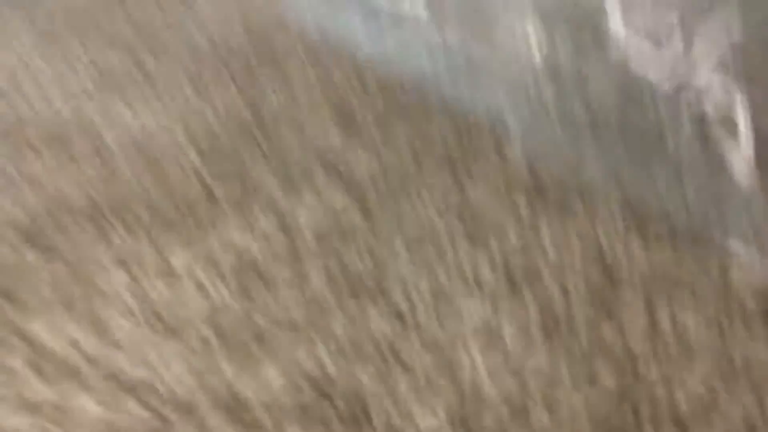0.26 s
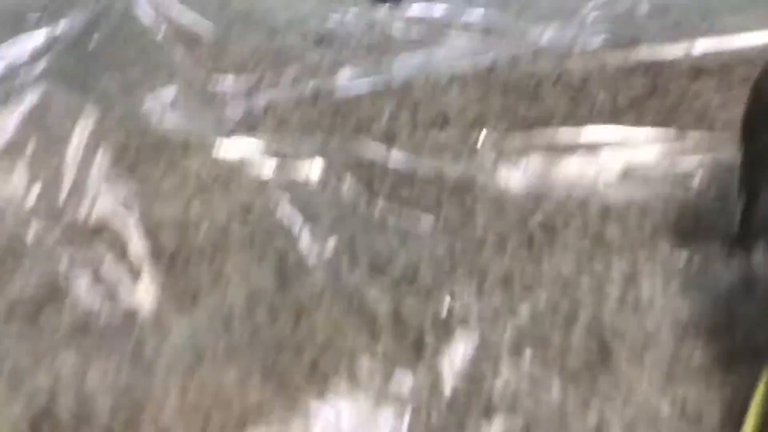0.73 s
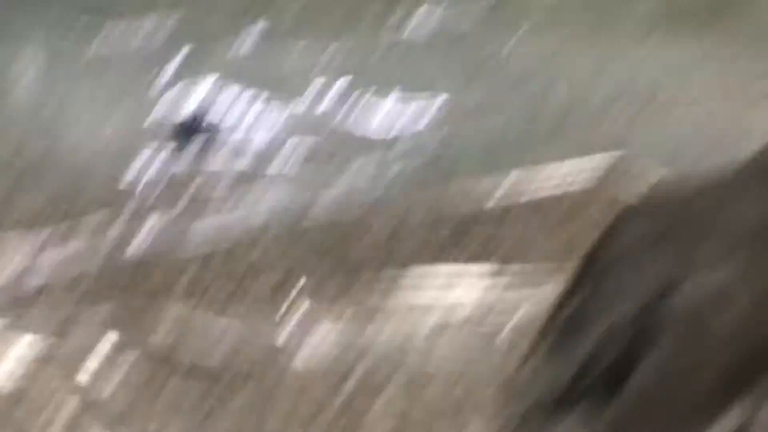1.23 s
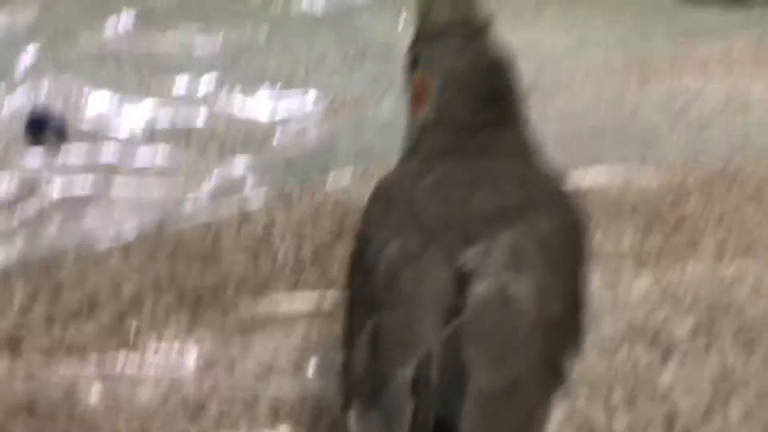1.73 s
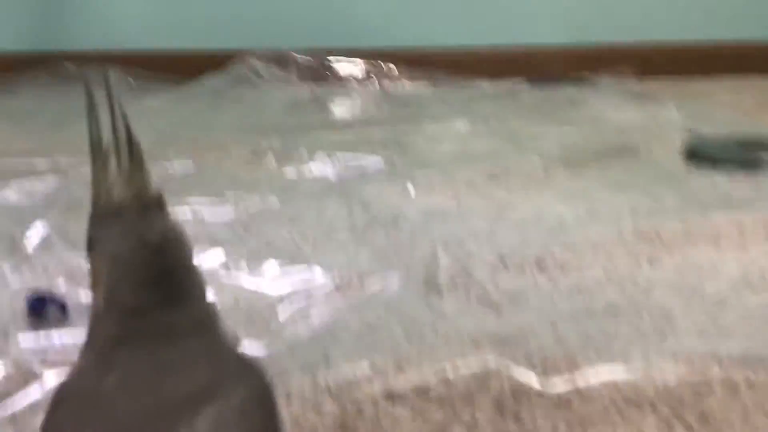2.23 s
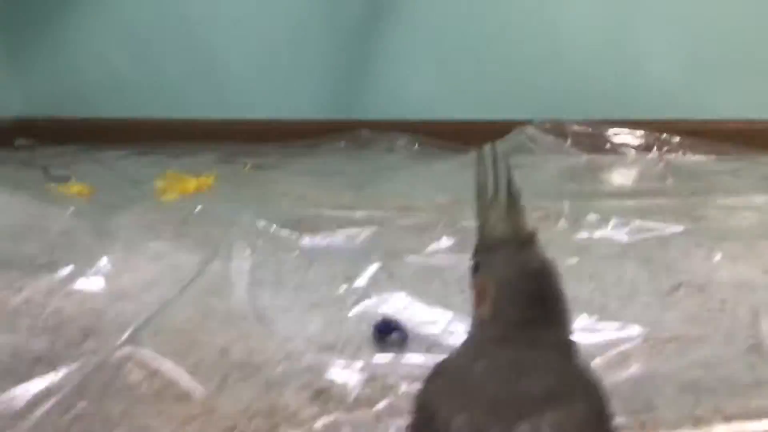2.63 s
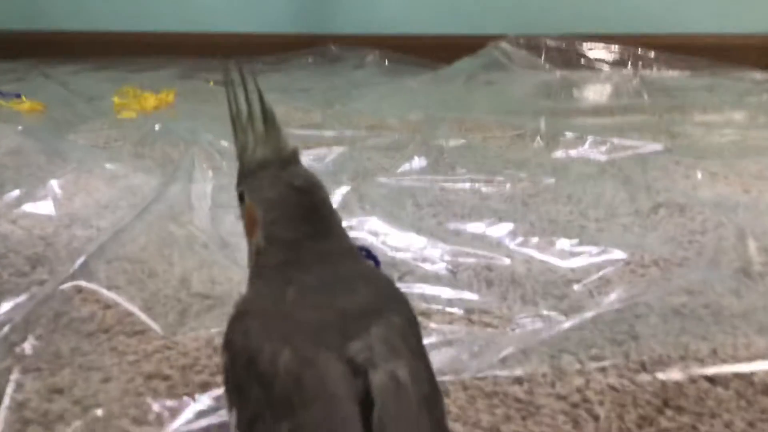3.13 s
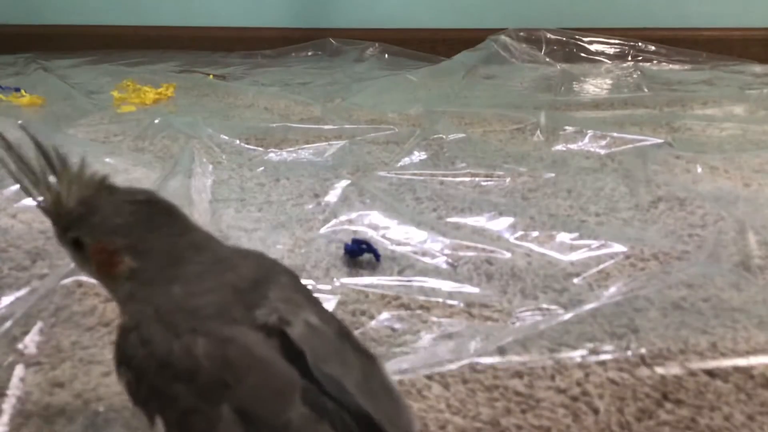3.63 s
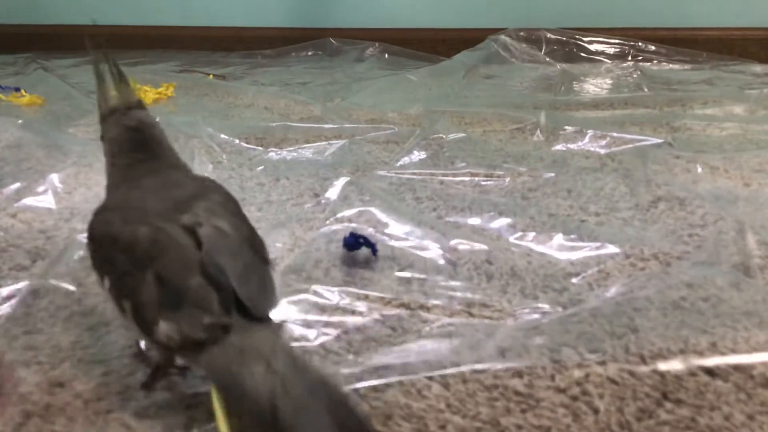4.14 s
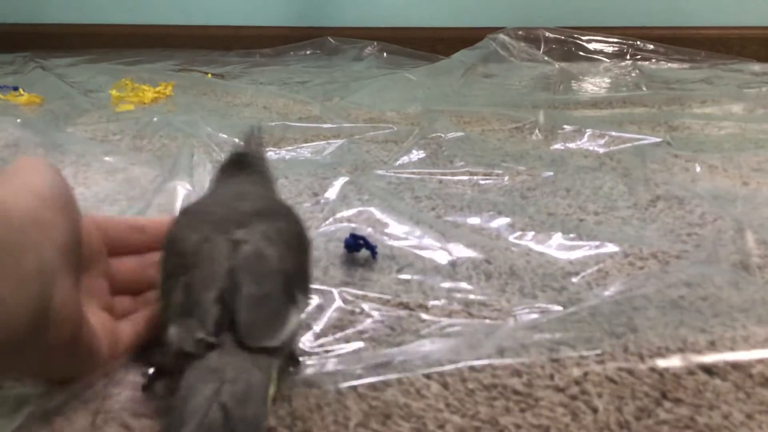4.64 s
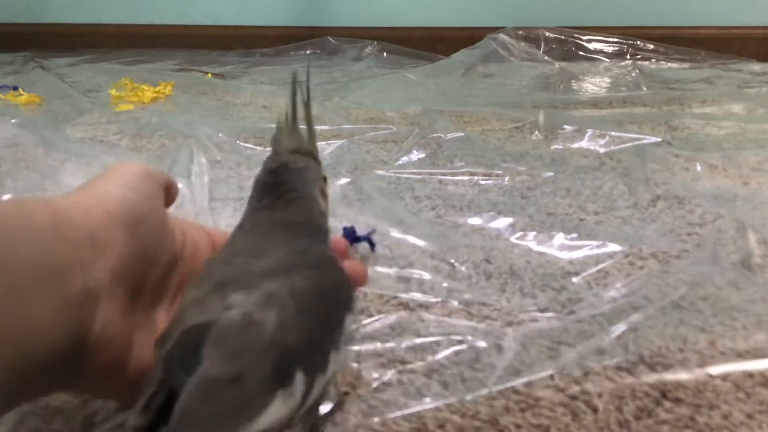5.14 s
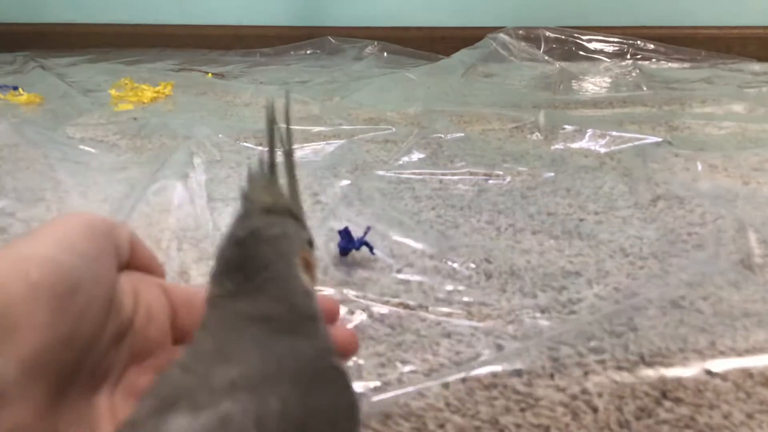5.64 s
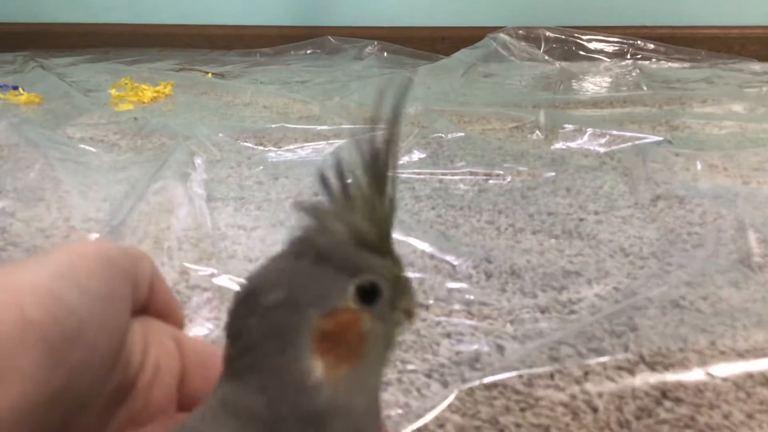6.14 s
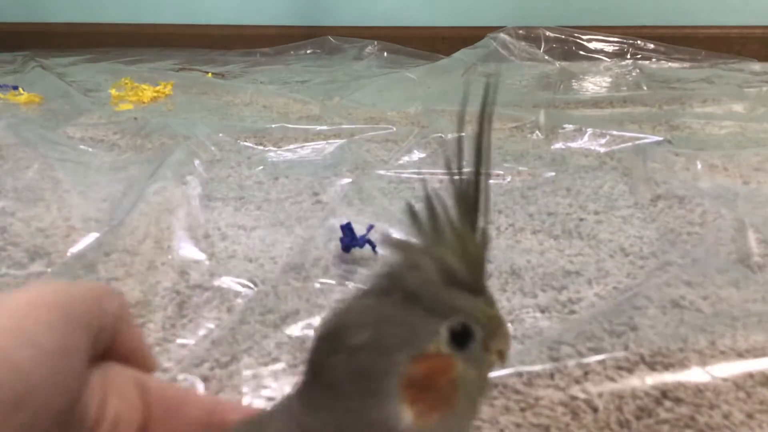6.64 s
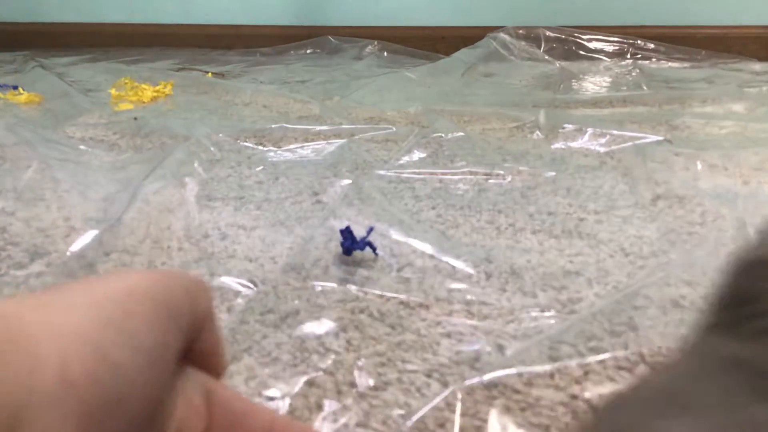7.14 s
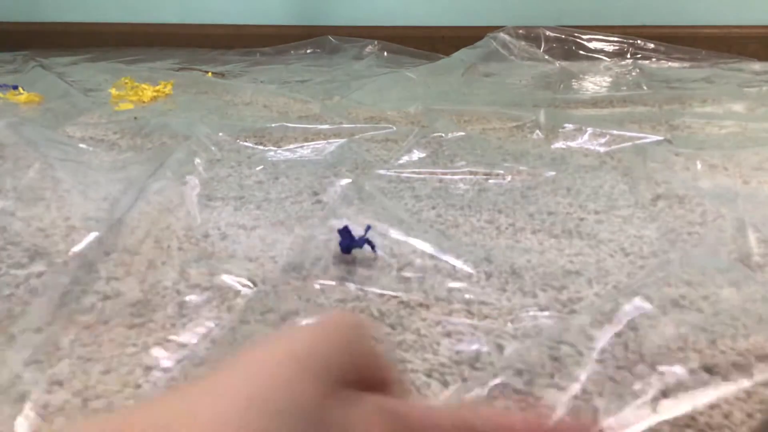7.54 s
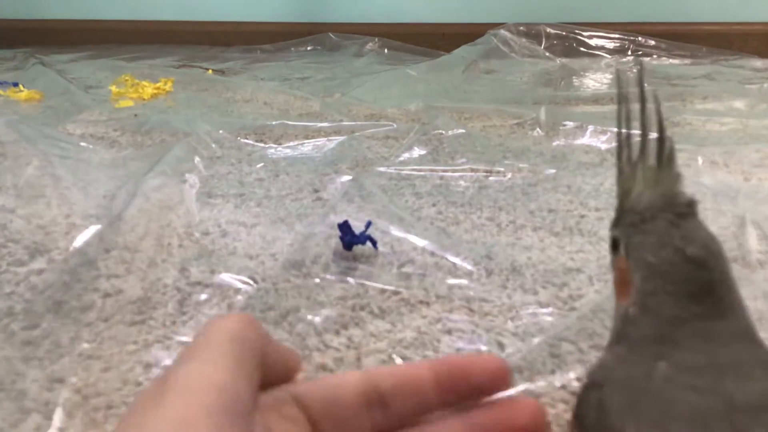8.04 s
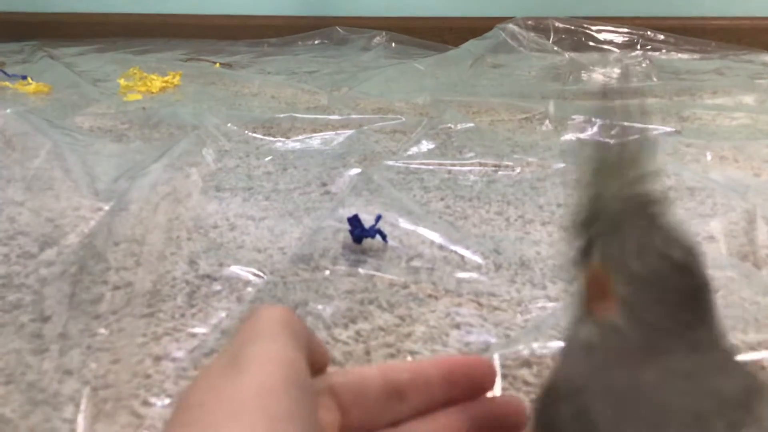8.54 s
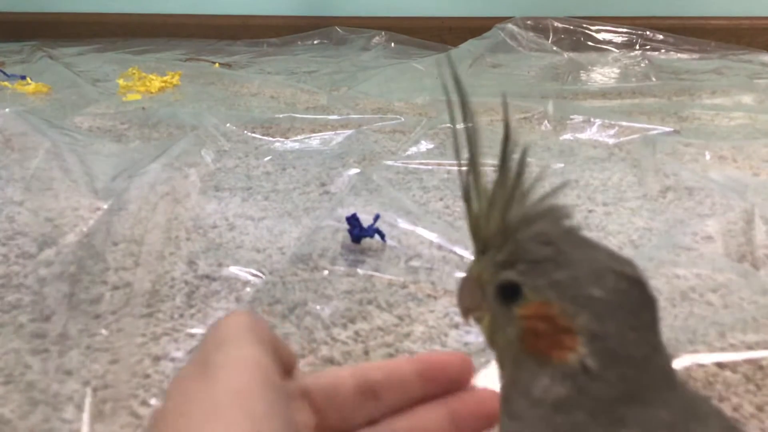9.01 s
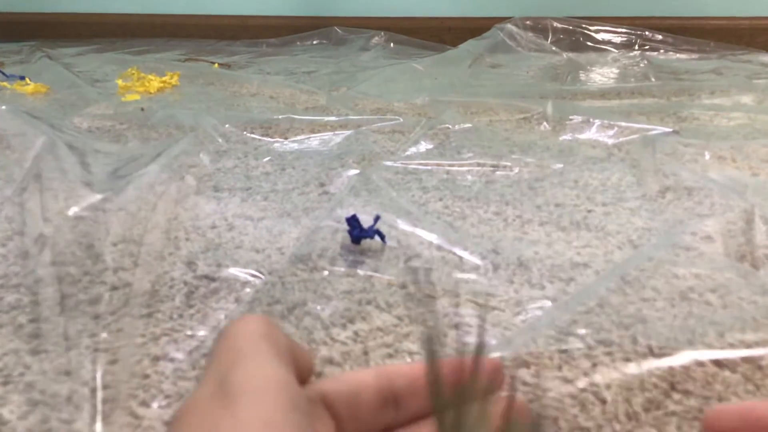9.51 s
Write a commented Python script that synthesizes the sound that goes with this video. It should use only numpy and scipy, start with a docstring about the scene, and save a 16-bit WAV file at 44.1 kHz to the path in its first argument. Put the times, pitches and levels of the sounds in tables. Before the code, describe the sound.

Close cloth rubbing and soft knocks give way to clear plastic sheeting crackling, snapping and rustling over carpet under bird feet and a hand.

```python
"""A hand-held phone is shuffled closer at first: cloth rubs in strokes of slip noise, with scuffs and soft knocks.
From about two seconds on, creases of clear plastic sheeting snap, each a bending wave with folds and a facet ring;
from about 3.4 s on, soft swishes of fine slips pass over the film. From four seconds on, a pet bird's feet and
a hand press the film into the carpet: it crackles, rustles and thuds. The carpeted room adds a short tail and
soft air throughout; a wavering hum is faint at first and stands at full level from 3.4 s."""
import sys
import numpy as np
from scipy import signal
from scipy.fft import rfft, irfft
from scipy.io import wavfile
from scipy.ndimage import uniform_filter1d, map_coordinates

SR = 44100
rng = np.random.default_rng(int(sys.argv[2]) if len(sys.argv) > 2 else 0)


def file_out(sig):
    """Save sig as 16-bit WAV at sys.argv[1]."""
    # one column per channel
    cols = np.atleast_2d(sig).T
    # limit, then scale
    lim = np.clip(cols, -1, 1)
    pcm = np.round(lim * 32767).astype(np.int16)
    wavfile.write(sys.argv[1], SR, pcm)


N = 430857
TIME = np.arange(N) / SR

# Creases that snap. Each row: start in seconds, level in dB, ring of the facet in Hz,
# brightness in dB per octave.
SNAPS = [(1.857, -35, 1200, 2.5), (2.794, -33.5, 2030, 3.5), (3.037, -40.5, 1250, -1.5),
         (3.329, -36.5, 1308, -2), (3.348, -36.5, 2010, 7), (3.535, -41, 1140, -7.5),
         (4.026, -47, 1300, -1), (4.059, -41, 1900, 1), (4.102, -43.5, 1860, 3), (4.116, -37.5, 2620, 6),
         (4.139, -43, 3830, 0), (4.349, -47.5, 1180, 0.5), (4.43, -49.5, 2250, 2), (4.478, -45, 1100, 4.5),
         (4.525, -32.5, 2200, 4), (4.646, -44, 3240, 8), (4.721, -38.5, 1130, 2), (4.733, -49, 1250, 3),
         (4.761, -35, 1270, -1), (4.898, -39.5, 1190, 0.5), (4.966, -40, 3240, 8), (5.006, -39.5, 1160, 1),
         (5.074, -37.5, 1230, 1.5), (5.165, -44, 2020, 3.5), (5.228, -36, 1110, 0.5),
         (5.235, -30.5, 1180, 0.5), (5.249, -35, 1270, 3.5), (5.303, -35, 2030, 0.5),
         (5.35, -35.5, 4560, 1), (5.359, -35.5, 1900, 11), (5.427, -40, 1130, 1.5), (5.585, -41.5, 1230, 1),
         (5.629, -24, 1940, 6), (5.75, -40.5, 1860, -1), (5.811, -39, 840, 1), (5.877, -35.5, 1140, 1),
         (5.922, -35.5, 1240, 2.5), (5.948, -42, 1240, -6), (5.994, -37.5, 1280, -2),
         (6.027, -39, 1120, -2.5), (6.321, -37, 1850, 1.5), (6.462, -39, 1040, 4), (6.498, -34.5, 1160, 6),
         (6.521, -39.5, 3000, -1), (6.542, -41, 1320, 1), (6.661, -33, 1140, 1.5), (6.709, -41, 1270, -3),
         (6.75, -40, 1280, -3), (6.821, -39.5, 1880, -3), (6.841, -40.5, 1370, -3.5), (6.94, -34, 1070, -3),
         (7.064, -40, 1240, -1.5), (7.114, -41.5, 1130, -7), (7.153, -35.5, 1800, -0.5),
         (7.237, -43, 1670, 10), (7.273, -43.5, 3200, 2), (7.363, -37.5, 1250, -2.5),
         (7.512, -31, 1180, 3.5), (7.524, -32, 1200, 4), (7.567, -35, 1870, -2), (7.635, -33.5, 1160, 1),
         (7.668, -38.5, 1000, 1), (7.693, -31.5, 2400, 5.5), (7.727, -36, 2360, 0),
         (7.811, -29.5, 896, -7.5), (7.817, -34, 2300, 7), (7.844, -31, 2300, -2.5),
         (7.963, -39.5, 1800, 3), (8.061, -39.5, 1110, -3.5), (8.129, -28.5, 4490, 5),
         (8.137, -32, 2400, 6), (8.181, -33, 2150, -2.5), (8.324, -36, 1760, -4), (8.357, -33, 1120, 0),
         (8.411, -37.5, 1130, -3.5), (8.484, -39, 1060, 3), (8.522, -33, 1090, -1.5),
         (8.78, -39, 3030, -4.5), (8.894, -35, 1040, -2), (8.964, -42.5, 2600, 1), (8.974, -36.5, 780, -4),
         (9.052, -39, 2140, 2), (9.115, -33.5, 3140, 8.5), (9.242, -34.5, 1063, -3.5),
         (9.267, -34, 2450, 2), (9.283, -37.5, 1870, 3), (9.331, -38, 1240, 3), (9.347, -36.5, 802, 1),
         (9.387, -35, 910, 0.5), (9.443, -33.5, 1230, -1), (9.527, -36.5, 1250, -3.5),
         (9.557, -38.5, 1160, -0.5), (9.681, -41, 1230, -1)]


def snaps():
    """Creases snap under feet and fingers, each ringing its own facet."""
    return creases(SNAPS, facet_db=12.5)


def neighbours(count=2, lag_s=0.024, weaker_db=-13.0, range_db=8):
    """A snapping crease loads the creases beside it, which tick just after."""
    s, db, _, tilt_db = np.repeat(SNAPS, count, axis=0).T
    when, weak, share, bright = rng.random((len(s), 4)).T
    moments = s + lag_s * (0.19 + 2 * when)
    db = np.minimum(db, np.median(db)) + weaker_db + range_db * (weak - .5)
    tilt_db = tilt_db / 2 + 8 * (bright - .5)
    return creases(np.column_stack([moments, db, facet_hz(share), tilt_db]), facet_db=13.0)


# Colour of a snap before its own brightness. Each row: frequency in Hz, relative level in dB.
SNAP_COLOUR = [(120, 4.5), (830, -2.5), (1250, -0.5), (1800, -3), (2700, -6), (4100, -7.5), (6100, -15),
               (9000, -30), (15000, -32)]
SNAP_WIDTH_S = 0.00024  # a snap has the energy of its level held this long


def creases(events, facet_db, travel_s=0.000635, echo_s=0.00303, echo_share=1.0, facet_width=0.064,
            flight_s=.0007, fold_damp_hz=5000):
    """Each crease sends out a bending wave, treble first; it returns from nearby folds and rings its own facet."""
    out, size = np.zeros(N), 2 ** 9
    f = np.fft.rfftfreq(size, 1 / SR)
    # bending waves speed up as the root of frequency; travel_s is the typical delay at 1 kHz
    bend = 4 * np.pi * np.sqrt(1000 * f) - np.pi * f / 2
    for (s, db, hz, tilt_db), (far, *folds) in zip(events, rng.random((len(events), 5))):
        path = travel_s * (.5 + far)
        direct = np.exp(-1j * bend * path)
        wave = direct * (1 + undb(facet_db) * resonance(f, hz, facet_width * hz))
        for k, late in enumerate(folds):
            delay = bend * path * (1 + late) + 2 * np.pi * f * echo_s * late
            echo = np.exp(-1j * delay - f * late / fold_damp_hz)
            wave = wave + (-1) ** k * echo_share * (1 - late / 2) * echo  # echoes alternate in sign
        snap = irfft(wave * response(SNAP_COLOUR, size, tilt_db))
        strength = np.sqrt(np.sum(snap ** 2) / (SR * SNAP_WIDTH_S))
        add(out, s + flight_s, snap * undb(db) / strength)
    return out


def facet_hz(share, lowest_hz=900):
    """Facets ring over two octaves, higher for a larger share."""
    return lowest_hz * 2 ** (2 * share)


# Colour of film sliding on itself. Each row: frequency in Hz, relative level in dB.
RUSTLE_COLOUR = [(300, -13), (800, -19), (1200, 3), (1650, 1), (2200, 10.5), (3100, 2), (4600, 3),
                 (6500, -4), (9500, -9), (15500, -7)]
# Colour of the carpet pile under the film. Each row: frequency in Hz, relative level in dB.
PRESS_COLOUR = [(30, -40), (60, -1), (180, 4), (300, -1), (450, -10), (640, -0.5), (900, -29), (2000, -51)]


def film(slide_db=-3.0, press_db=0, tick_db=-8, range_db=14, tick_follow=0.46, tick_tilt_db=-5.5, count=440):
    """Stirred film slides softly, crackles, ticks at many small creases and presses on the pile beneath."""
    rustle, pressure = stirring()
    slips = grains(rate=2000, spread_db=2) * catches(110)
    slide = colour(slips, RUSTLE_COLOUR) * undb(slide_db)
    pile = colour(grains(rate=980, spread_db=6.5), PRESS_COLOUR) * undb(press_db)
    when, weak, share, bright = rng.random((count, 4)).T
    moments, stir_db = give_way(rustle, when)
    db = tick_db + tick_follow * stir_db - range_db * np.sqrt(weak)
    tilt_db = tick_tilt_db + 10 * (bright - .5)
    ticks = creases(np.column_stack([moments, db, facet_hz(share), tilt_db]), facet_db=15.5)
    return rustle * slide + crackle(rustle) + ticks + pressure * pile


# A foot or finger presses the film into the carpet. Each row: middle in seconds, half length in seconds,
# rustle drive in dB, thud drive in dB.
PRESSES = [(4.082, .06, -69, -73), (4.558, .035, -65, -74), (4.743, .04, -66, -76),
           (4.958, .07, -70.5, -77), (5.401, .06, -70, -72), (5.592, .03, -70, -69),
           (6.024, .05, -70, -64.5), (6.513, .03, -62, -57), (6.746, .08, -73, -67),
           (6.951, .03, -66, -58.5), (7.195, .07, -73, -67), (7.524, .03, -56, -46.5),
           (7.699, .035, -59, -53), (7.847, .045, -63, -56), (8.13, .05, -64, -56.5),
           (8.333, .08, -66, -54), (8.505, .04, -69, -53), (8.766, .07, -63, -57), (8.919, .05, -61, -53),
           (9.062, .1, -61, -57.5), (9.277, .07, -64, -52.5), (9.444, .035, -63, -53),
           (9.699, .03, -65, -56)]
# Unrest of the film between presses. Each row: time in seconds, rustle drive in dB.
UNREST = [(2.7, -90), (4.3, -87), (4.55, -79), (5.45, -71.5), (6.2, -82), (7.6, -76), (9.77, -77)]


def stirring(unrest_thud_db=-5, onset=2.6, release=2):
    """How hard the film rustles and bears on the carpet: presses over a low unrest."""
    rustle = undb(np.interp(TIME, *np.transpose(UNREST)))
    pressure = undb(unrest_thud_db) * rustle
    for s, half, rustle_db, thud_db in PRESSES:
        press = swell(s, half, half, onset, release)
        rustle = np.hypot(rustle, undb(rustle_db) * press)  # powers add
        pressure = np.hypot(pressure, undb(thud_db) * press)
    return rustle, pressure


def give_way(stir, when):
    """Strain gathers as the film is stirred: the moments at which creases give way, and the stirring then in dB."""
    strain = np.cumsum(stir) / np.sum(stir)
    moments = np.interp((np.arange(len(when)) + when) / len(when), strain, TIME)
    return moments, 20 * np.log10(np.interp(moments, TIME, stir))


def crackle(stir, crackle_db=22, range_db=17, lowest_hz=1100, octaves=2.21, cycles=1.35, count=750):
    """The tiniest facets flip one after another, each ringing for a few cycles at its own pitch."""
    out, t = np.zeros(N), TIME[:SR // 100]
    when, weak, share = rng.random((count, 3)).T
    pitches = lowest_hz * 2 ** (octaves * share)
    for s, stir_db, soft, hz in zip(*give_way(stir, when), np.sqrt(weak), pitches):
        turns = hz * t
        flip = np.sin(2 * np.pi * turns) * (1 - np.exp(-turns)) * np.exp(-turns / cycles)
        add(out, s, undb(stir_db + crackle_db - range_db * soft) * flip)
    return out


# Soft swishes, and at 5.65 s the ringing room tail of the loud snap. Each row: loudest moment in seconds,
# rise in seconds, fall in seconds, level in dB, ring in Hz.
SWISHES = [(3.42, 0.048, 0.16, -74.5, 2210), (3.85, 0.046, 0.18, -65.5, 4380),
           (5.65, 0.0088, 0.066, -70, 1980), (6.14, 0.088, 0.078, -67, 2250),
           (7.23, 0.046, 0.032, -57, 1800), (8.17, 0.03, 0.093, -60.5, 2220)]
# Colour of the fine slips. Each row: frequency in Hz, relative level in dB.
SWISH_COLOUR = [(800, 5), (1300, 1), (2600, -3), (3400, -9), (4800, -13), (6500, -20), (15500, -27)]


def swishes(ring_db=7, ring_width_hz=600):
    """Streams of fine slips swell and fade, each with a resonance at its own pitch."""
    slips, out = colour(grains(rate=4000, spread_db=0.5), SWISH_COLOUR), np.zeros(N)
    f = np.fft.rfftfreq(2 ** 9, 1 / SR)
    for s, rise, fall, db, hz in SWISHES:
        ring = irfft(1 + undb(ring_db) * resonance(f, hz, ring_width_hz))
        out += undb(db) * swell(s, rise, fall) * unit(signal.oaconvolve(slips, ring)[:N])
    return out


# Cloth strokes past the phone while shuffling closer. Each row: middle in seconds, half length in seconds,
# drag in dB, hiss in dB, both before the trims and the grip in rubbing().
RUBS = [(0.104, 0.11, -49.5, -57), (0.33, 0.11, -52.5, -59.5), (0.461, 0.11, -50, -55.5),
        (0.688, 0.2, -55, -62), (1.012, 0.055, -55, -64.5), (1.219, 0.15, -50.5, -62.5),
        (1.526, 0.12, -59, -83.5), (1.728, 0.071, -52, -68.5), (1.939, 0.06, -51.5, -72.5),
        (2.217, 0.1, -54.5, -67), (2.496, 0.1, -55.5, -59.5)]
# The cloth lifts clear of the phone for a moment. Each entry: middle in seconds.
LIFTS = [1.405, 1.822, 2.305]
# Colour of the dragging cloth. Each row: frequency in Hz, relative level in dB.
DRAG_COLOUR = [(30, -11), (60, 4.5), (130, 0.5), (280, 0.5), (480, -4), (640, 3.5), (740, -7), (860, -22.5),
               (1300, -17), (2500, -38)]
# Colour of the hissing fibres. Each row: frequency in Hz, relative level in dB.
HISS_COLOUR = [(500, 1), (1250, -3), (1600, -6.5), (2450, -2.5), (3000, -6.5), (4500, -8), (6000, -16.5),
               (7700, -20.5), (8500, -11.5), (10500, -19), (15500, -19)]
# light contact between strokes, before the same trims
SHUFFLE_END_S, SHUFFLE_DB, SHUFFLE_HISS_DB = 2.896, -63.5, -74.5
STROKE_ONSET, STROKE_RELEASE = 2.3, 4  # powers of the flanks
LIFT_HALF_S, LIFT_DB = 0.024, -13


def rubbing(drag_db=1.5, hiss_db=5.0, judder_db=1.56):
    """Cloth drags close to the phone in strokes: a hollow judder under a hiss of fibres with wandering colour."""
    contact = uniform_filter1d(1. * (TIME < SHUFFLE_END_S), size=8000)
    drag, hiss = undb(SHUFFLE_DB) * contact, undb(SHUFFLE_HISS_DB) * contact
    for s, half, low_db, high_db in RUBS:
        stroke = swell(s, half, half, STROKE_ONSET, STROKE_RELEASE)
        drag = np.hypot(drag, undb(low_db) * stroke)
        hiss = np.hypot(hiss, undb(high_db) * stroke)
    lifted = sum(swell(s, LIFT_HALF_S, LIFT_HALF_S, STROKE_RELEASE, STROKE_RELEASE) for s in LIFTS)
    grip = undb(judder_db * walk(130) + LIFT_DB * lifted)
    body = colour(grains(rate=1000, spread_db=0.5), DRAG_COLOUR) * undb(drag_db)
    fibres = colour(grains(rate=29000, spread_db=5.0), HISS_COLOUR) * undb(hiss_db)
    return grip * (drag * body + hiss * drift(fibres, share=.025, rate=6))


# Skin and cloth scuffs that build up and let go. Each row: loudest moment in seconds, rise in seconds,
# fall in seconds, scrape in dB, ring of the phone's shell in dB, creak in dB.
SCUFFS = [(0.059, 0.0099, 0.016, -42, -42.5, -59), (0.104, 0.018, 0.0069, -33, -48, -58),
          (.145, 0.018, 0.035, -41, -46, -60), (0.702, 0.028, 0.019, -51, -51.5, -63),
          (.808, 0.047, 0.056, -57, -53.5, -68), (1.441, 0.0066, 0.014, -50, -80, -92),
          (1.947, 0.01, 0.012, -42.5, -59, -49.5), (2.157, 0.015, 0.021, -49, -70, -43.5),
          (2.17, 0.0077, 0.0092, -39, -54, -44), (2.237, 0.023, 0.026, -46.5, -47.5, -43.5),
          (2.52, 0.098, 0.091, -59, -72, -49), (2.698, 0.03, 0.02, -39.5, -50.5, -47),
          (7.695, 0.033, 0.015, -58, -67, -47), (7.842, 0.013, 0.0053, -41, -62, -51.5)]
# Modes of the phone's shell. Each row: pitch in Hz, width of a single pass in Hz, relative level in dB.
SHELL = [(1172, 170, 6.5), (2380, 290, 20.5), (2880, 430, 15.5), (3660, 600, 9)]
# Colour of the scrape. Each row: frequency in Hz, relative level in dB.
SCUFF_COLOUR = [(150, 19), (700, -2.5), (1800, 0.5), (4200, -8.5), (7300, -23), (8600, -11), (11000, -21),
                (15500, -25)]
CREAK_HZ, CREAK_WIDTH_HZ = 564, 370  # skin chattering on the case; width of a single pass


def scuffs(shift_db=4):
    """Dense slips swell and catch as a surface drags; skin creaks, and the shell rings with shifting modes."""
    slips = grains(rate=3000, spread_db=1.8) * catches(220)
    f = np.fft.rfftfreq(2 ** 11, 1 / SR)

    def rung(hz, width):
        """Ring one mode with the slips, passed through its resonance twice."""
        return unit(signal.oaconvolve(slips, irfft(resonance(f, hz, width) ** 2))[:N])

    ring = unit(sum(undb(db + shift_db * np.tanh(walk(55.6))) * rung(hz, width) for hz, width, db in SHELL))
    creak, scrape = rung(CREAK_HZ, CREAK_WIDTH_HZ), colour(slips, SCUFF_COLOUR)
    out = np.zeros(N)
    for s, rise, fall, scrape_db, ring_db, creak_db in SCUFFS:
        mix = undb(scrape_db) * scrape + undb(ring_db) * ring + undb(creak_db) * creak
        out += swell(s, rise, fall) * mix
    return out


# Soft knocks of hand and body. Each row: start in seconds, level in dB before the envelope,
# starting pitch in Hz before the wobble, decay length in seconds.
KNOCKS = [(0.0755, -15.5, 279, 0.011), (0.0884, -15.5, 121, 0.011), (0.128, -22.5, 154, 0.009),
          (0.137, -32, 106, 0.026), (0.442, -34, 80, 0.039), (0.776, -30, 132, 0.026),
          (0.871, -32.5, 120, 0.023), (1.357, -37, 90, 0.025), (2.113, -23.5, 763, 0.004),
          (2.118, -25, 188, 0.0072), (2.1725, -27.5, 770, 0.004), (2.177, -21, 168, 0.011),
          (2.208, -31, 710, 0.0052), (2.211, -31, 169, 0.011), (2.248, -25, 146, 0.015),
          (2.627, -42.5, 140, 0.029), (2.705, -23.5, 173.6, 0.02), (2.728, -26, 115.7, 0.0097),
          (2.744, -30.5, 132, 0.0076), (3.077, -25.5, 262, 0.0057), (3.086, -36, 84, 0.028),
          (6.663, -38, 496, 0.006), (7.81, -30, 430, 0.0045), (7.82, -39, 161, 0.014),
          (8.343, -32.5, 165, 0.014)]


def knocks(settle=0.55, attack_s=0.00082, rough=0.22, rattle_db=-12):
    """A soft blow gives a few swings that sag towards a share of their starting pitch, with a brief rattle on top."""
    out, t = np.zeros(N), TIME[:SR // 5]
    wobble, rattle = walk(420), colour(rng.standard_normal(N), DRAG_COLOUR)
    for s, db, hz, length in KNOCKS:
        here = int(s * SR) + np.arange(len(t))
        fresh = np.exp(-t / length)
        pitch = hz * (settle + (1 - settle) * fresh) * (1 + rough * wobble[here])
        swing = np.sin(2 * np.pi * np.cumsum(pitch) / SR)
        blow = swing + undb(rattle_db) * fresh * rattle[here]
        envelope = (1 - np.exp(-t / attack_s)) * np.exp(-(t / length) ** 1.63)
        add(out, s, undb(db) * blow * envelope)
    return out


def room(x, wet_db=-20, first_s=0.0024, t60_s=.36):
    """A carpeted room answers with a short, dull tail."""
    t = TIME[:SR // 2]
    noise = colour(rng.standard_normal(len(t)), [(200, -12.0), (2200, 1.5), (5000, 3.5), (12000, -14.5)])
    tail = noise * np.exp(-np.log(1000) * t / t60_s) * (t > first_s)
    return signal.fftconvolve(x, tail / np.sqrt(np.sum(tail ** 2)))[:N] * undb(wet_db)


# Mains-driven hum. Each row: pitch in Hz, level in dB before waver and arrival, waver as a share.
HUM = [(120, -64.5, 0.61), (181, -80, 0.22)]
# The hum is fainter at first and rises to full level by 3.4 s. Each row: time in seconds, gain in dB.
HUM_ARRIVAL = [(2.7, -6), (3.4, 0)]
# Colour of the room air. Each row: frequency in Hz, relative level in dB.
ROOM_COLOUR = [(25, -4.5), (60, 4.5), (110, 9), (250, 3), (420, -5), (620, -3.5), (850, -16.5), (4000, -23),
               (15500, -36.5)]


def background(air_db=-65, swell_db=2.2):
    """Room air is coloured noise that swells softly; the hum is sines wavering in level and phase."""
    hum = np.zeros(N)
    for hz, db, waver in HUM:
        wavering = 1 + waver * (walk(11) + 1j * walk(8.6))
        hum += undb(db) * np.sqrt(2) * np.real(wavering * np.exp(2j * np.pi * hz * TIME))
    arrival = undb(np.interp(TIME, *np.transpose(HUM_ARRIVAL)))
    air = undb(air_db + swell_db * walk(7.2)) * colour(rng.standard_normal(N), ROOM_COLOUR)
    return hum * arrival + air


def undb(db):
    """Decibels to gain."""
    return 10 ** (np.asarray(db) / 20)


def unit(x):
    """Scale to rms 1."""
    return x / np.sqrt(np.mean(x ** 2))


def add(out, s, x):
    """Mix x into out from time s on."""
    i = max(int(s * SR), 0)
    out[i:i + len(x)] += x[:len(out) - i]


def response(points, size, tilt_db=0):
    """Causal frequency response of a colour, tilted by tilt_db an octave from 700 to 9000 Hz."""
    octave = np.log2(np.maximum(np.fft.rfftfreq(size, 1 / SR), 1))
    hz, db = np.transpose(points)
    level_db = np.interp(octave, np.log2(hz), db)
    level_db = level_db + tilt_db * np.clip(octave, np.log2(700), np.log2(9000))
    # folding the cepstrum forward gives minimum phase
    cepstrum = irfft(np.log(undb(level_db)))
    cepstrum[1:size // 2] *= 2
    cepstrum[size // 2 + 1:] = 0
    return np.exp(rfft(cepstrum))


def colour(x, points):
    """Give x a colour; rms 1."""
    return unit(signal.oaconvolve(x, irfft(response(points, size=8192)))[:len(x)])


def resonance(f, hz, width):
    """Response of one mode at frequencies f, gain 1 at its centre."""
    return 1j * f * width / (hz ** 2 - f ** 2 + 1j * f * width)


def walk(rate):
    """Smooth chance of rms 1, heading for a new value rate times a second."""
    k = max(int(SR / rate), 1)
    steps = np.repeat(rng.standard_normal(N // k + 1), k)
    return unit(uniform_filter1d(steps, k)[:N])


def grains(rate, spread_db):
    """Tiny slips at random moments, rate a second, most small and a few large; rms 1."""
    size = undb(spread_db * np.minimum(rng.exponential(size=N), 4))
    return unit((rng.random(N) < rate / SR) * size * np.sign(rng.standard_normal(N)))


def catches(rate, catch_db=5):
    """A dragged surface sticks and lets go by turns: a gain that swings between weak and strong."""
    return unit(undb(catch_db * np.tanh(2 * walk(rate))))


def drift(x, share, rate):
    """Let the resonances of x wander up and down by a share of their pitch."""
    return map_coordinates(x, [np.cumsum(1 + share * walk(rate))], mode="mirror")


def swell(s, rise, fall, onset=2, release=2):
    """A contact builds up until time s and lets go; higher onset and release powers give steeper flanks."""
    out, near = np.zeros(N), slice(max(int((s - 4 * rise) * SR), 0), int((s + 4 * fall) * SR))
    t = TIME[near] - s
    out[near] = np.exp(-np.where(t < 0, np.abs(t / rise) ** onset, np.abs(t / fall) ** release))
    return out


def scene():
    """The sheet sounds into the room; rubbing, scuffs and knocks are right at the microphone."""
    sheet = snaps() + neighbours() + film() + swishes()
    return (sheet + room(sheet) + scuffs() + rubbing() + knocks() + background())[None]


def record(dry, bass_hz=47, top_hz=16000):
    """The phone thins the deep bass and cuts the top."""
    thin = signal.sosfilt(signal.butter(4, bass_hz, "highpass", fs=SR, output="sos"), dry)
    return signal.sosfilt(signal.ellip(10, .2, 70, top_hz, fs=SR, output="sos"), thin)


dry = scene()
out = record(dry)
file_out(out)
```